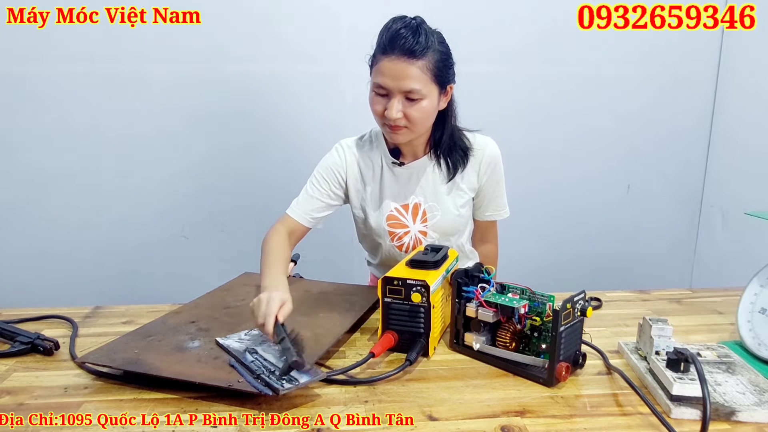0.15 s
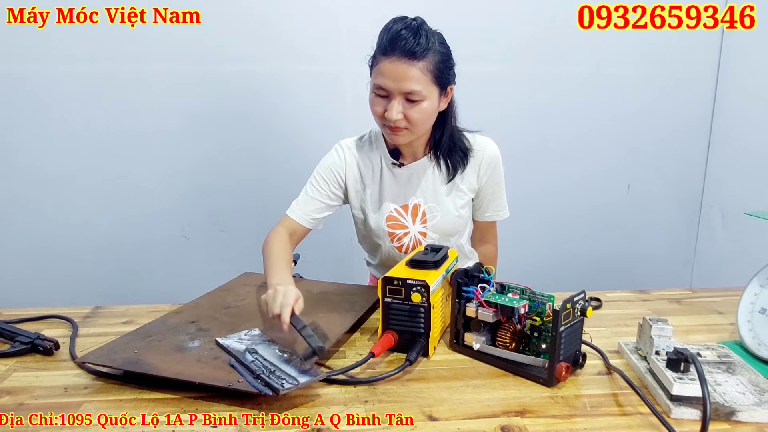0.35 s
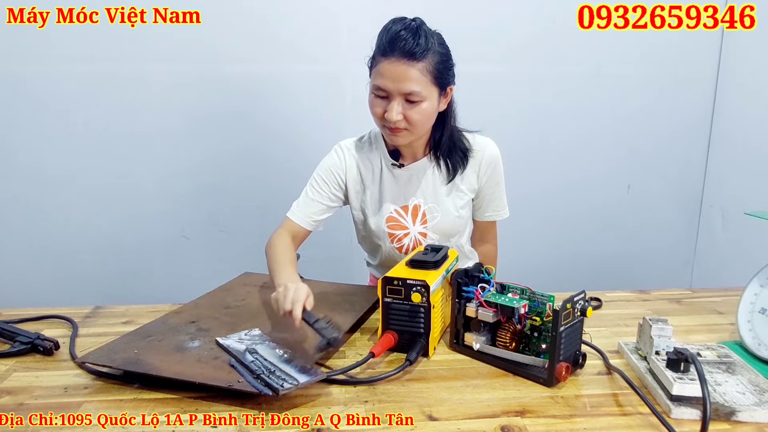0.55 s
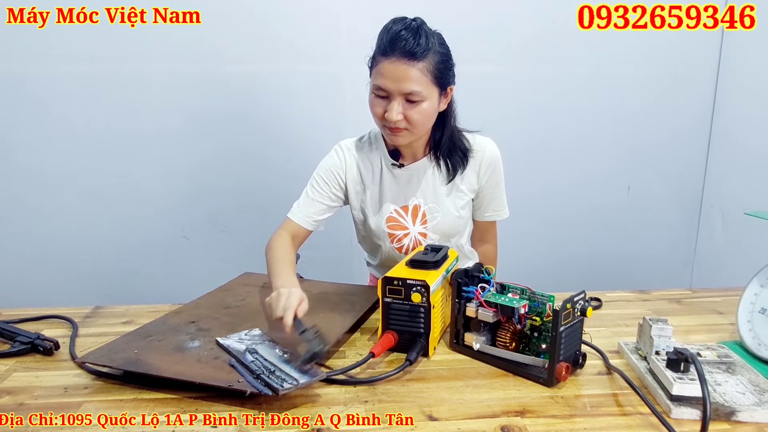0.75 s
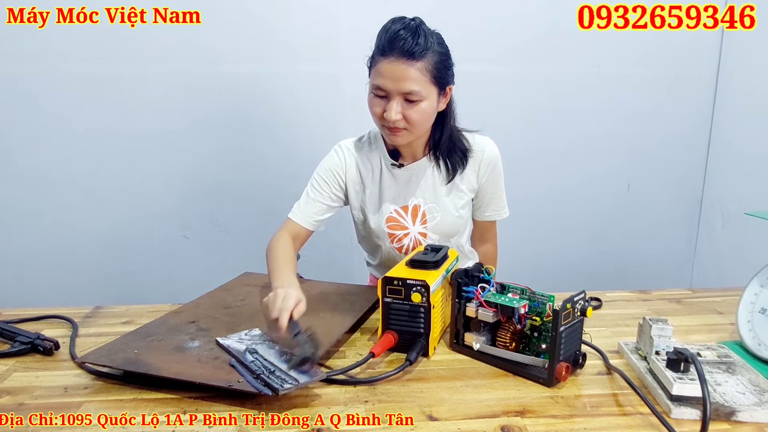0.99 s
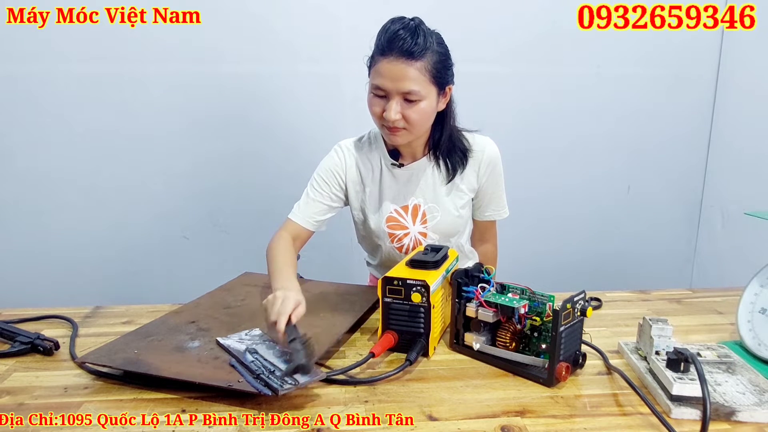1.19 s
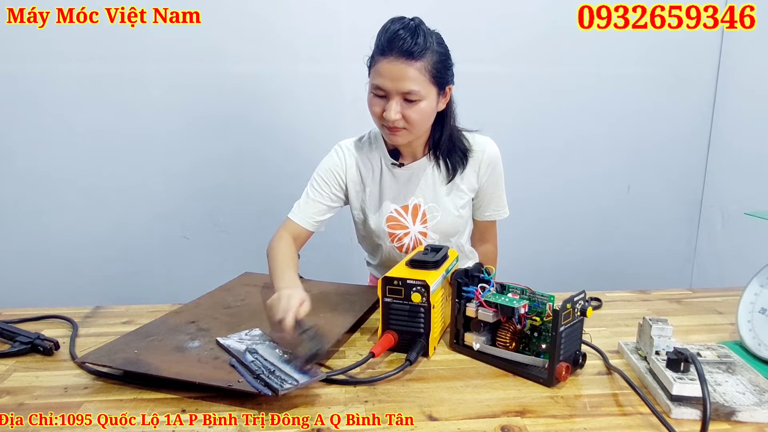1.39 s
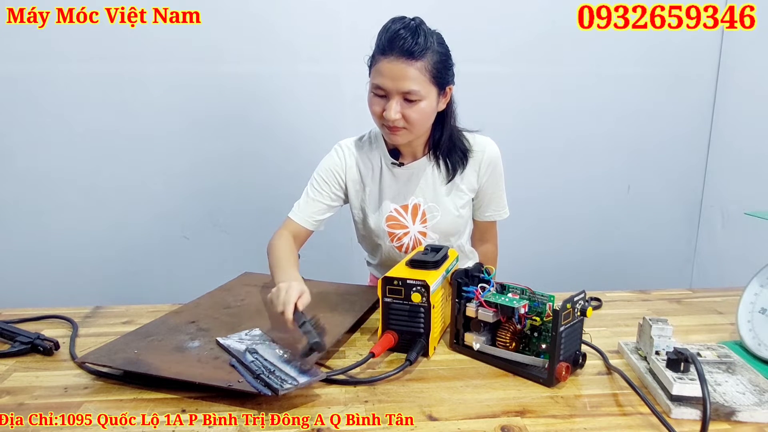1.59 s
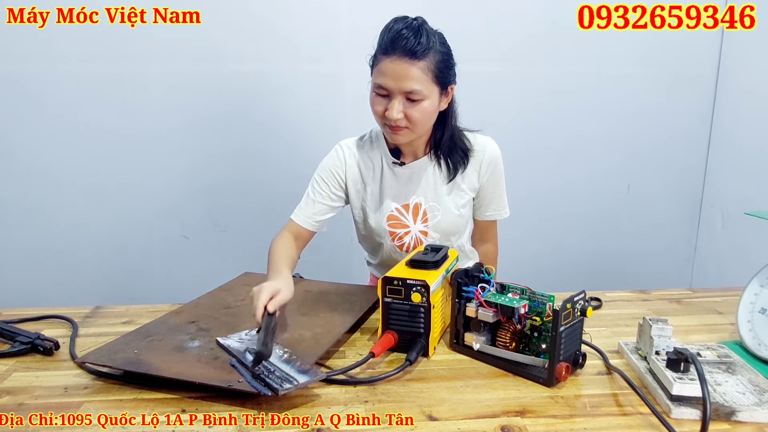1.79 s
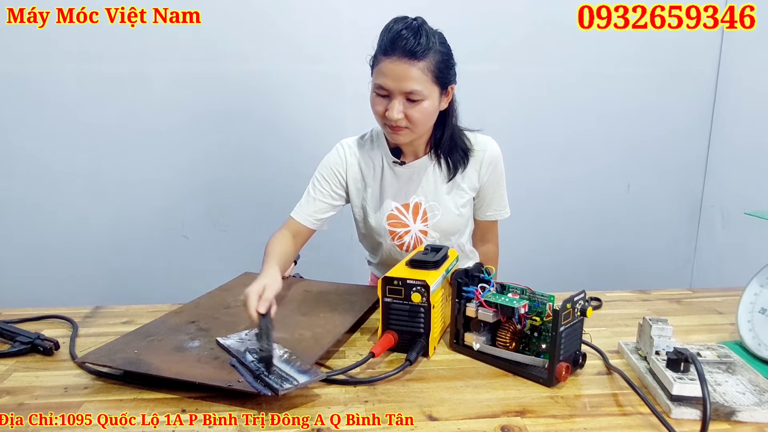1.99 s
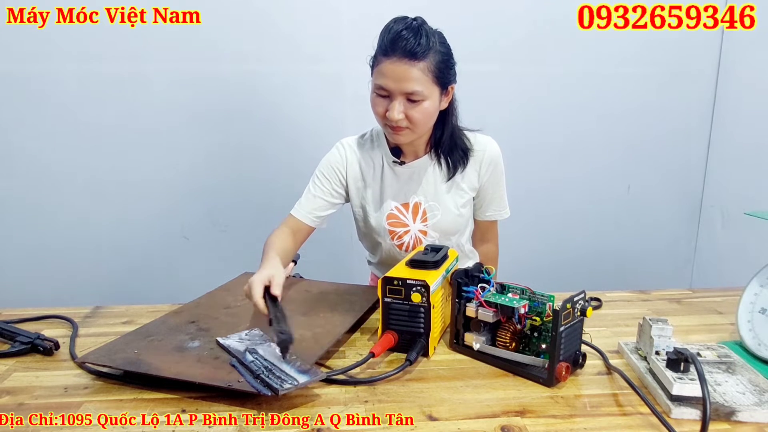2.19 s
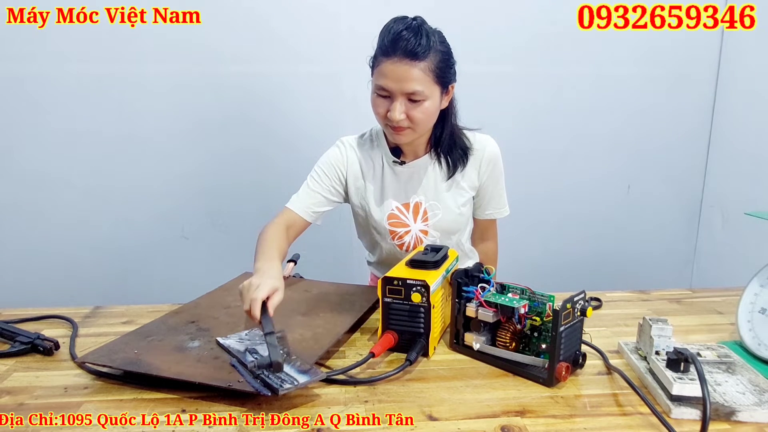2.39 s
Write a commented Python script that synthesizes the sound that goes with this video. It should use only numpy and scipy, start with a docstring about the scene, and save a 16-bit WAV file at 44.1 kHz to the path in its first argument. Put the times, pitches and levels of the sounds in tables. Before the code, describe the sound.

Hammer blows on a welded steel plate: an earlier clang is still ringing at the start, then hard, bright clanks fall at about 0.23, 0.51, 0.76, 1.0, 1.25, 1.52, 1.78 and 2.06 seconds. Each differs slightly in colour, with clatter, sheet hum and high pings. Light rebounds follow some blows; slag crumbs tick, especially around 0.65 and 0.93. Faint low workshop noise; loud peaks flattened.

```python
"""Chipping hammer on a welded plate

A chipping hammer strikes a welded steel plate eight times, about four blows a second, in a small workshop.
Decaying modes make the plate's clang, the hum of the steel sheet under it and the pings of the hammer head.
Shaped noise makes the clatter and the room floor; noise bursts and sparse impulses make the slag.
A limiter in the recorder flattens each blow."""
import sys
import numpy as np
from scipy import signal
from scipy.fft import rfft, irfft
from scipy.io import wavfile
from scipy.ndimage import uniform_filter1d, minimum_filter1d

SR = 44100
rng = np.random.default_rng(int(sys.argv[2]) if len(sys.argv) > 2 else 0)


def persist_wave(psi):
    """Save psi, clipped to +-1, as 16-bit WAV."""
    counts = np.round(np.clip(psi, -1, 1) * 32767).astype(np.int16)
    wavfile.write(sys.argv[1], SR, np.atleast_2d(counts).T)


N = 108045
CONTROL_T_S = np.arange(0, N, 16) / SR  # time axis of the envelopes


def from_db(db):
    """Decibels to amplitude ratio."""
    return 10 ** (np.asarray(db) / 20)


def rms_one(x):
    """Scales to unit RMS."""
    return x / np.sqrt(np.mean(x ** 2) + 1e-20)


def at_hz(hz, points_hz, values):
    """Reads a curve on a log-frequency axis."""
    return np.interp(np.log(hz + 1e-3), np.log(points_hz), values)


def at_audio_rate(envelope):
    """Interpolates a control-rate envelope to all samples."""
    return np.interp(np.arange(N) / SR, CONTROL_T_S, envelope)


def dying(t_s, t60_s):
    """Exponential decay, 60 dB in t60_s."""
    return np.exp(-np.log(1000) * t_s / t60_s)


def shaped_noise(points_hz, density_db):
    """Stationary noise of unit RMS with a given spectral shape."""
    f_hz = np.arange(N // 2 + 1) * SR / N
    spectrum = rfft(rng.standard_normal(N)) * from_db(at_hz(f_hz, points_hz, density_db))
    return rms_one(irfft(spectrum, N))


def bandpass(x, band_hz):
    """Second-order Butterworth band-pass."""
    return signal.sosfilt(signal.butter(2, band_hz, "band", fs=SR, output="sos"), x)


def add(out, start_s, sound):
    """Mixes a sound in from start_s."""
    i = int(start_s * SR)
    sound = sound[max(-i, 0):max(N - i, 0)]
    out[max(i, 0):max(i, 0) + len(sound)] += sound


# Blows, each on another spot with its own colour; the first is still ringing at the start:
# start_s, ring_length_factor, thud_db, clang_db, middle_db, bright_db, edge_db, crack_db,
# sheet_low_db, sheet_high_db, ping_1_db, ping_2_db, ping_3_db, ping_4_db, pitch_sag_hz
BLOWS = [ (-.2, 1.47, 2, -8, -5, 0.5, 1, 6, -7, 10, -8.5, -8.5, -21, 5, 0),
         (0.2269, 1.46, -1.5, -1, 3.5, -1.5, -4, 0.5, 5.5, -6, -2.5, 4, 7.5, -2, 2.5),
         (.5097, 1.08, -2.5, -4, -4, -14.5, -6.5, -4, 6.5, 1, -9, -20, -15, -14, 10),
         (0.7612, 0.97, 4, -4.5, -7, -5, 4.5, 2, -1.5, -7, 0, 0.5, -11, -13, 3.5),
         (0.9976, 1.28, -1, -5, -1, -2, 2, 1, -1.5, -6.5, 8, 1.5, -9, 1.5, 37.5),
         (1.248, 1.31, 1.5, -1, 3.5, -1, -1.5, -2.5, 7.5, 4.5, -1.5, -10, -8, -1, 10),
         (1.5244, 1.17, 1.5, 0, 6.5, 0.5, 0.5, 1.5, -11, -5.5, -3.5, -2, -6.5, 0.5, 66),
         (1.7818, 1.283, -0.5, 0.5, 6, 2.5, 0.5, 3.5, 2, -8, -8, 0, 1.5, -12, 34),
         (2.0567, 1.27, -5, -1, 0, 4.5, -0.5, -1.5, 3.5, 6, -0.5, -14.5, -6.5, 3.5, 4.5)]
# Centres of the six colours, thud to crack: pitch_hz
COLOUR_HZ = [400, 1230, 1900, 3500, 4300, 8500]
# Hammer drops back on the plate: start_s, level_db (against the blow before)
REBOUNDS = [(0.2445, -11), (0.524, -9), (2.073, -11.5), (2.121, -12)]


def contacts():
    """Blows, then rebounds with their blow's colour: start_s, gain, length, colour_db, family_db, sag_hz."""
    rows = [(blow[0], 0, blow) for blow in BLOWS]
    for start_s, level_db in REBOUNDS:
        blow_before = [blow for blow in BLOWS if blow[0] < start_s][-1]
        rows.append((start_s, level_db, blow_before))
    split = 2 + len(COLOUR_HZ)
    return [(start_s, from_db(level_db), blow[1], blow[2:split], blow[split:-1], blow[-1])
            for start_s, level_db, blow in rows]


SWELL_S = 0.0011  # build-up time constant
SAG_S = 0.02396  # the hammer's weight flattens the plate's pitch until it lifts
CONTACT_KEEP = 0.73  # share of the older ringing that outlasts a new contact
WAVER_HZ = 45.42  # knots per second


def mode(pitch_hz, strikes, waver_share):
    """One mode struck at each (start_s, gain, t60_s, sag_hz): swells, rises to pitch, wavers and dies."""
    envelope = 0
    for start_s, gain, t60_s, sag_hz in sorted(strikes):
        t_s = np.maximum(CONTROL_T_S - start_s, 0)
        turns = rng.random() + sag_hz * SAG_S * np.exp(-t_s / SAG_S)
        level = gain * (1 - np.exp(-t_s / SWELL_S)) * dying(t_s, t60_s)
        envelope = envelope * np.where(t_s > 0, CONTACT_KEEP, 1)
        envelope = envelope + level * np.exp(2j * np.pi * turns)
    # complex noise wavers both level and phase
    knots = rng.standard_normal((1024, 2)) @ [1, 1j]
    wander = np.interp(CONTROL_T_S * WAVER_HZ, np.arange(len(knots)), knots)
    wander = np.sqrt(1 - waver_share ** 2) + waver_share * wander
    carrier = np.exp(2j * np.pi * pitch_hz * np.arange(N) / SR)
    return (at_audio_rate(envelope * wander) * carrier).real


# Modes of the welded plate: pitch_hz
PLATE_HZ = [317, 419, 543, 764, 812, 1227, 1308, 1472, 1560, 1602, 1814, 2000, 2158, 2201, 2341, 2573, 2828,
            2888, 2955, 3179, 3219, 3297, 3456, 3555, 3684, 3814, 3882, 4053, 4161, 4591, 4783, 6459]
# Same modes before blow colour: level_db
PLATE_DB = [-39, -46, -30.5, -52.5, -36, -17, -25.5, -34.5, -28.5, -24.5, -32, -25.5, -34.5, -33, -34,
            -32.5, -32.5, -38.5, -30, -29, -29, -26.5, -31.5, -60, -37, -22.5, -25.5, -29, -32, -36, -34,
            -48]
# Ring time at 1 kHz before the blow's length factor; share lost per octave up
PLATE_T60_S, T60_FALL_PER_OCTAVE = 0.31, 0.1
PLATE_WAVER_SHARE = 0.72  # chatter and room reflections make the modes waver


def plate():
    """Clang of the welded plate: higher modes die sooner."""
    out, hits = np.zeros(N), contacts()
    for pitch_hz, level_db in zip(PLATE_HZ, PLATE_DB):
        t60_s = PLATE_T60_S * (1 - T60_FALL_PER_OCTAVE) ** np.log2(pitch_hz / 1000)
        strikes = []
        for start_s, gain, length, colour_db, _, sag_hz in hits:
            strike_db = level_db + at_hz(pitch_hz, COLOUR_HZ, colour_db)
            strikes.append((start_s, gain * from_db(strike_db), t60_s * length, sag_hz))
        out += mode(pitch_hz, strikes, PLATE_WAVER_SHARE)
    return out


# Mode families, one row each: sheet low, sheet high, hammer head pings 1-4 (rising): pitch_hz per mode
FAMILY_HZ = [
    [564, 1008],
    [1089, 1249, 1601],
    [4286, 4306],
    [5383, 9500],
    [5813, 5996, 8341, 8545, 10890],
    [6661, 6735, 7883, 10190, 11035, 11778, 14100],
]
# Same layout, before the blow's family level: level_db per mode
FAMILY_DB = [
    [-35.5, -51],
    [-35.5, -48.5, -36],
    [-36.5, -35.5],
    [-26.5, -45],
    [-31.5, -28, -44, -62, -61],
    [-30, -28, -42, -66, -56.5, -69, -75],
]
# Same layout: t60_s per mode
FAMILY_T60_S = [
    [1.034, 1.66],
    [1.21, 0.98, 0.46],
    [0.8, 0.41],
    [0.36, .35],
    [0.33, 0.36, 0.43, 0.49, 0.61],
    [0.35, 0.19, 0.25, 0.55, 0.38, .3, 0.31],
]
# Wavering part of each family: waver_share
FAMILY_WAVER_SHARE = [0.41, 0.17, 0.45, 0.86, 0.98, 0.57]


def sheet_and_hammer():
    """Sheet hum and hammer head pings: each blow favours other families of modes."""
    out, hits = np.zeros(N), contacts()
    for k, family in enumerate(zip(FAMILY_HZ, FAMILY_DB, FAMILY_T60_S)):
        for pitch_hz, level_db, t60_s in zip(*family):
            strikes = [(start_s, gain * from_db(level_db + family_db[k]), t60_s, 0)
                       for start_s, gain, _, _, family_db, _ in hits]
            out += mode(pitch_hz, strikes, FAMILY_WAVER_SHARE[k])
    return out


# Crowd of lesser modes, spread by the room: pitch_hz, density_db (per Hz, relative), t60_s (before length factor)
CLATTER = [(50, -23, 0.33), (131, -8.5, 0.38), (344, -0.5, 0.11), (605, 3, .26), (765, -12.5, 0.15),
           (1060, 6.5, 0.34), (1140, 3, 0.083), (1650, 3.5, 0.11), (2200, -6, 0.43), (2840, -6, 0.13),
           (3090, 1, 0.24), (4430, 8, 0.11), (4750, -10.5, 0.26), (6080, -3.5, 0.092), (8300, -14, 0.077),
           (11200, -31.5, .24), (13400, -43, 0.23), (16000, -45, .15)]
CLATTER_DB, CLATTER_RISE_S, CLATTER_HOLD_S = -21, 0.0012, 0.01
# Tail level against the body; t60 where CLATTER rings longest; mode density
TAIL_DB, TAIL_T60_S, TAIL_MODES_PER_HZ = -12, 1, 0.03


def clatter():
    """Dense modes hold while the plate chatters, then die band by band; a sparser crowd rings on as a tail."""
    points_hz, density_db, t60s_s = np.transpose(CLATTER)
    f_hz, out, hits = np.arange(N // 2 + 1) * SR / N, np.zeros(N), contacts()
    dense = rfft(shaped_noise(points_hz, density_db))
    share = TAIL_MODES_PER_HZ * SR / N  # share of bins kept
    sparse = dense * (rng.random(len(f_hz)) < share) / np.sqrt(share)
    edges_hz = np.geomspace(30, 18000, 25)
    for low_hz, high_hz in zip(edges_hz, edges_hz[1:]):
        band = (f_hz >= low_hz) & (f_hz < high_hz)
        centre_hz = np.sqrt(low_hz * high_hz)
        t60_s = at_hz(centre_hz, points_hz, t60s_s)
        tail_t60_s = TAIL_T60_S * t60_s / t60s_s.max()
        body_power, tail_power = 0, 0
        for start_s, gain, length, colour_db, *_ in hits:
            t_s = np.maximum(CONTROL_T_S - start_s, 0)
            strength = gain * from_db(at_hz(centre_hz, COLOUR_HZ, colour_db))
            strength = strength * (1 - np.exp(-t_s / CLATTER_RISE_S))
            held_t_s = np.maximum(t_s - CLATTER_HOLD_S, 0)
            body_power = body_power + (strength * dying(held_t_s, t60_s * length)) ** 2
            tail_power = tail_power + (strength * dying(t_s, tail_t60_s)) ** 2
        out += at_audio_rate(np.sqrt(body_power)) * irfft(dense * band, N)
        out += from_db(TAIL_DB) * at_audio_rate(np.sqrt(tail_power)) * irfft(sparse * band, N)
    return from_db(CLATTER_DB) * out


def burst(level_db, decay_s):
    """Brittle snap: exponentially decaying white noise."""
    t_s = np.arange(SR // 20) / SR
    return from_db(level_db) * np.exp(-t_s / decay_s) * rng.standard_normal(len(t_s))


# Fine grit trickling over the steel, before band-pass: time_s, level_db
GRIT_LEVEL = [(0, -49), (.1, -55), (.22, -79), (.55, -62), (.66, -50), (.74, -68), (.93, -56), (1.2, -57),
              (1.45, -74), (2.0, -65), (2.35, -86)]
# Crumbs of slag landing, before band-pass: start_s, level_db
CRUMBS = [(.128, -44), (0.64, -33.5), (0.656, -36.5), (.739, -42), (.917, -29), (.936, -35), (1.125, -37),
          (1.227, -36)]
# Band of crumbs and grit: low_hz, high_hz
CRUMB_HZ = (2500, 7100)
GRIT_PER_S, CRUMB_DECAY_S = 2100, 0.0016
# Slag shatters under the point; level before band-pass
CRACK_DB, CRACK_DECAY_S, CRACK_HZ = -22.5, 0.0016, (3000, 8640)


def slag():
    """Crust cracks at each blow; crumbs and fine grit land as band-passed bursts and impulses."""
    grit = (rng.random(N) < GRIT_PER_S / SR) * rng.standard_normal(N)
    grit_db = np.interp(np.arange(N) / SR, *np.transpose(GRIT_LEVEL))
    debris = from_db(grit_db) * rms_one(grit)
    for start_s, level_db in CRUMBS:
        add(debris, start_s, burst(level_db, CRUMB_DECAY_S))
    cracks = np.zeros(N)
    for start_s, *_ in BLOWS:
        add(cracks, start_s, burst(CRACK_DB, CRACK_DECAY_S))
    return bandpass(cracks, CRACK_HZ) + bandpass(debris, CRUMB_HZ)


# Workshop background spectrum: pitch_hz, density_db (per Hz, relative)
FLOOR = [(25, -18), (65, -4.5), (140, 4.5), (260, 1), (600, -6), (1500, -9), (4000, -13.5), (7000, -21),
         (11000, -37.5), (15000, -51)]
FLOOR_DB = -53  # RMS


def workshop():
    """Steady background: shaped noise, mostly low."""
    return from_db(FLOOR_DB) * shaped_noise(*np.transpose(FLOOR))


def scene():
    """Sums all sources at one microphone."""
    return (plate() + sheet_and_hammer() + clatter() + slag() + workshop())[None]


LIMIT_DB, RELEASE_DB_PER_S, LIMIT_ATTACK_S = -6.5, 98, 0.0029
CUTOFF_HZ = 16200


def record(dry):
    """Fast limiter with a linear-in-dB release, then a steep low-pass."""
    over_db = np.maximum(20 * np.log10(np.abs(dry[0]) + 1e-9) - LIMIT_DB, 0)
    ramp_db = RELEASE_DB_PER_S * np.arange(N) / SR
    gain_db = ramp_db - np.maximum.accumulate(over_db + ramp_db)  # peak hold, steady recovery
    width = max(int(LIMIT_ATTACK_S * SR), 1)
    gain_db = uniform_filter1d(minimum_filter1d(gain_db, width), width)
    low_pass = signal.cheby2(12, 70, CUTOFF_HZ + 800, fs=SR, output="sos")  # stopband edge, 70 dB down
    return signal.sosfilt(low_pass, dry * from_db(gain_db))


dry = scene()
out = record(dry)
persist_wave(out)
```